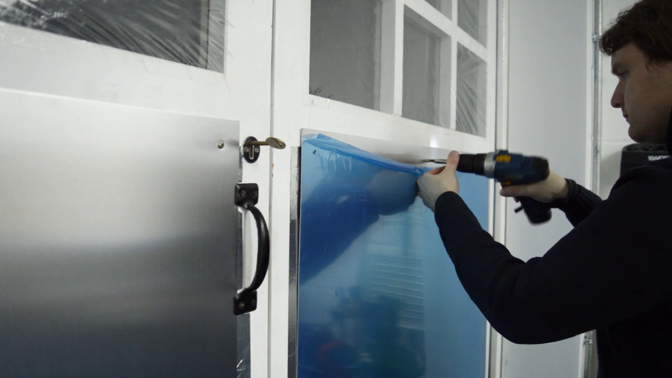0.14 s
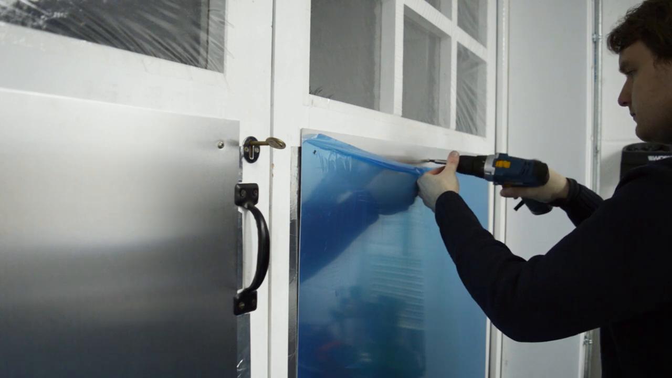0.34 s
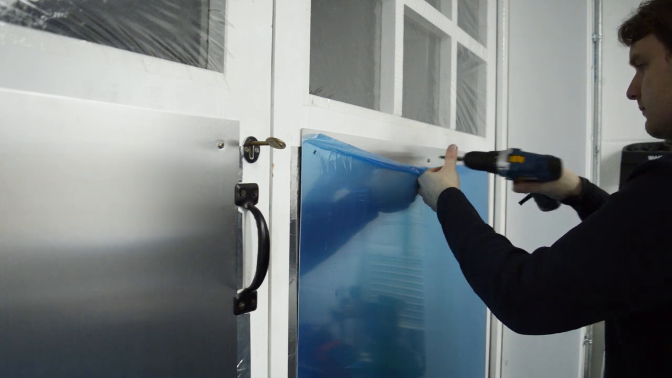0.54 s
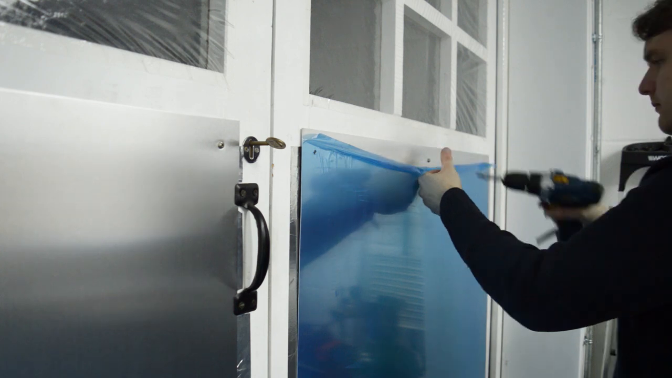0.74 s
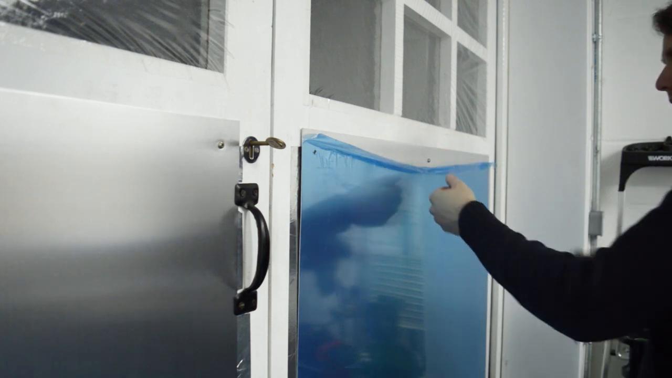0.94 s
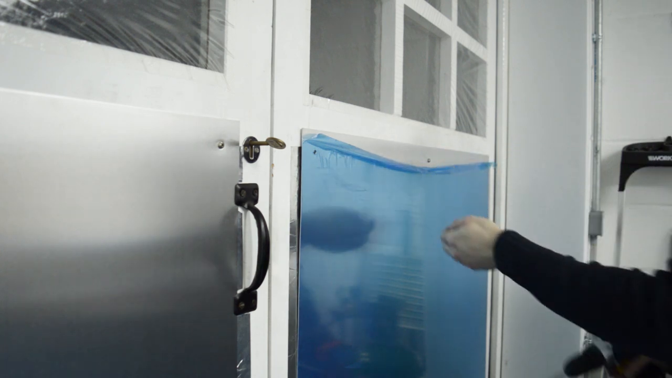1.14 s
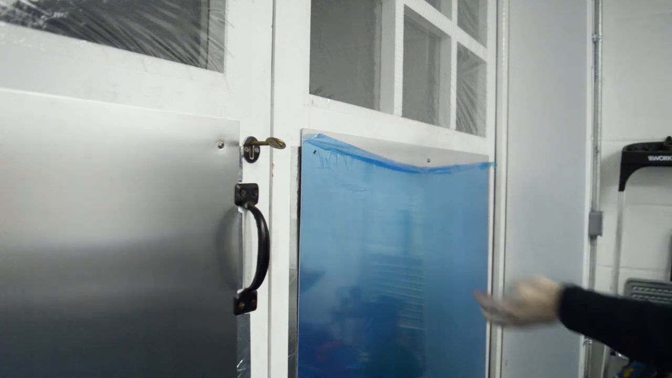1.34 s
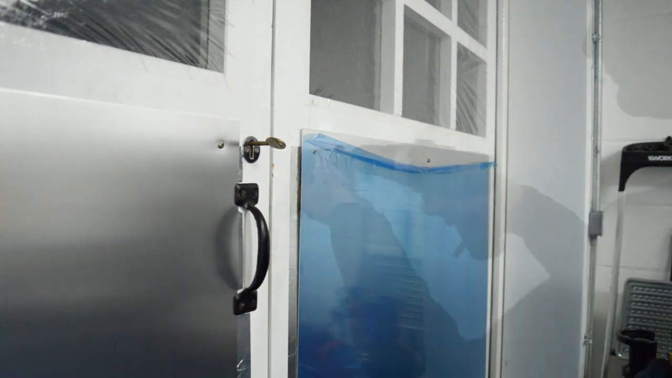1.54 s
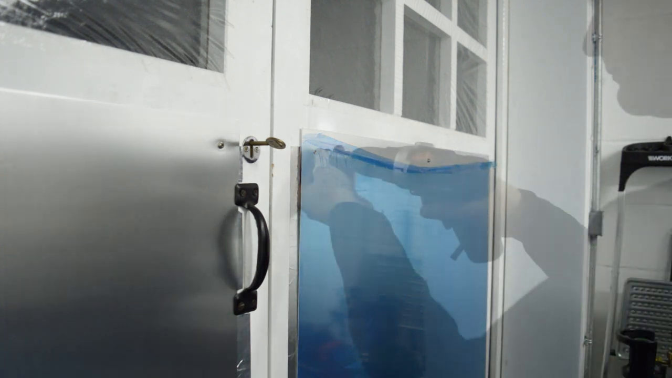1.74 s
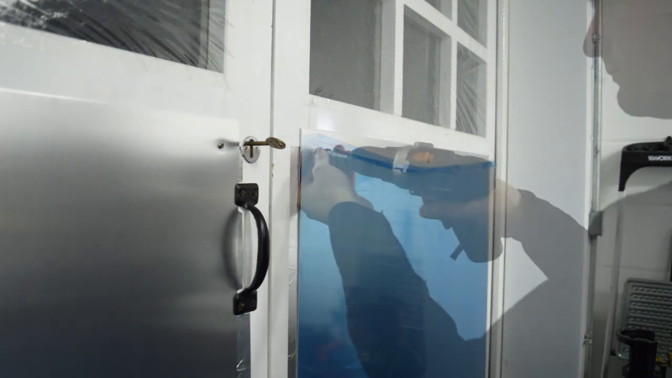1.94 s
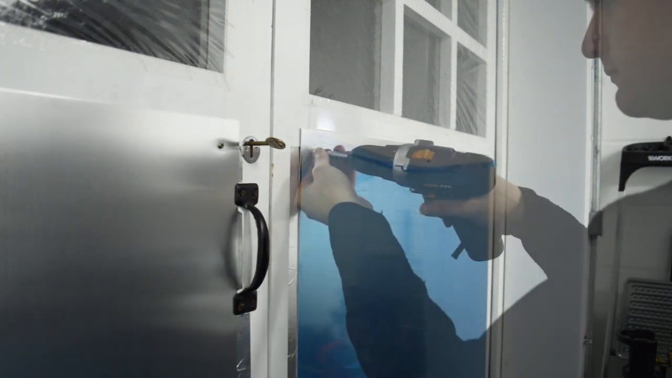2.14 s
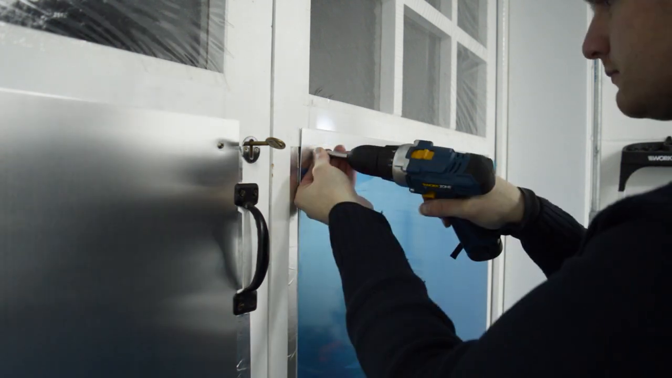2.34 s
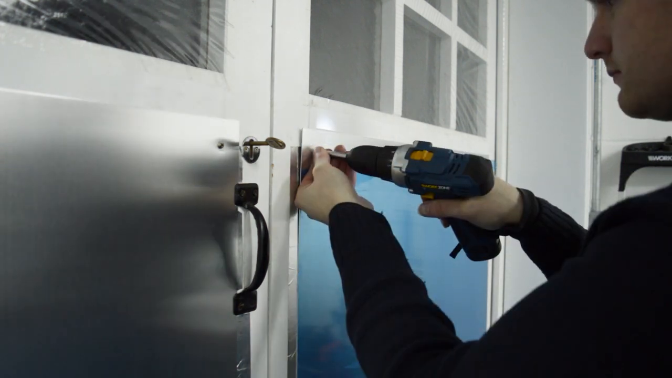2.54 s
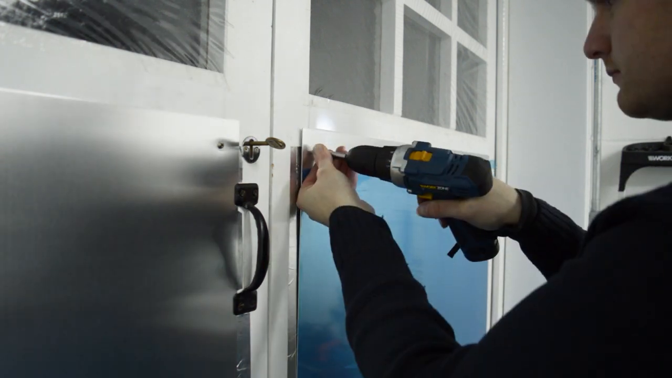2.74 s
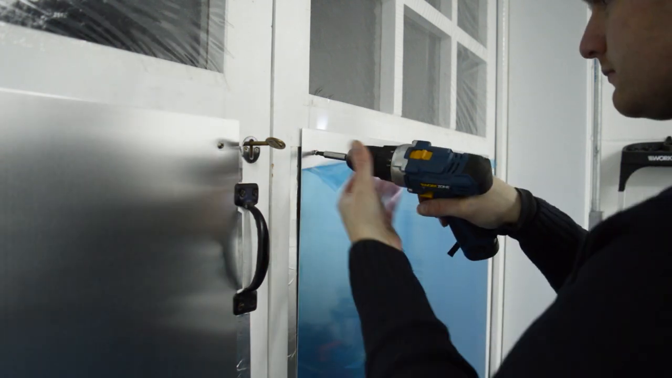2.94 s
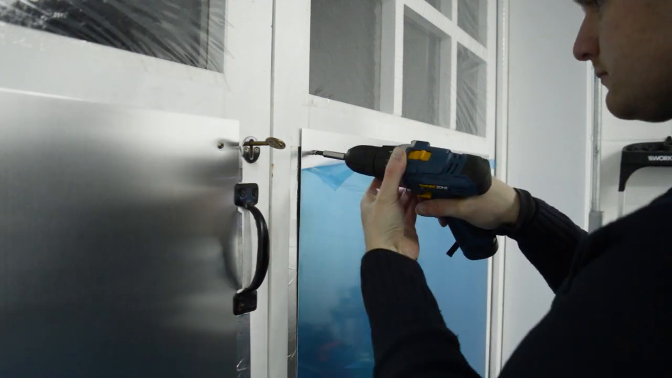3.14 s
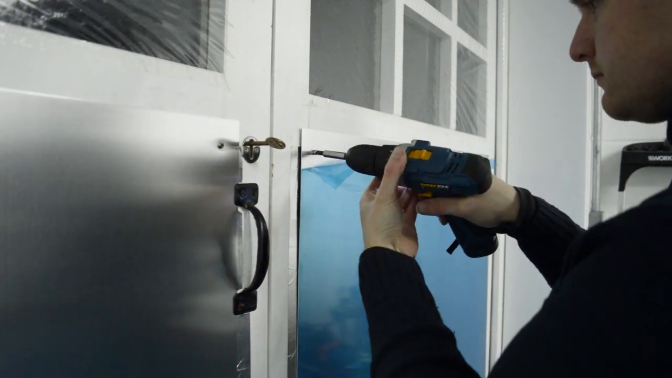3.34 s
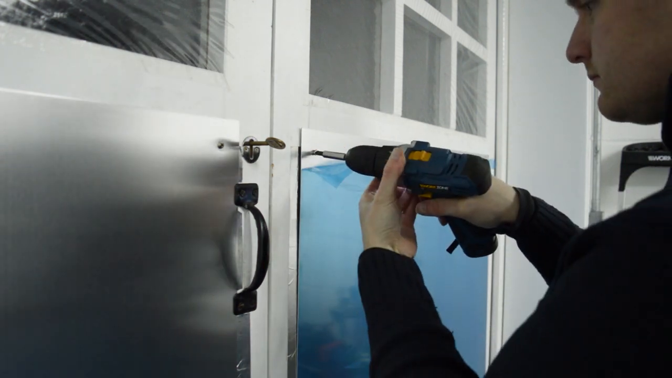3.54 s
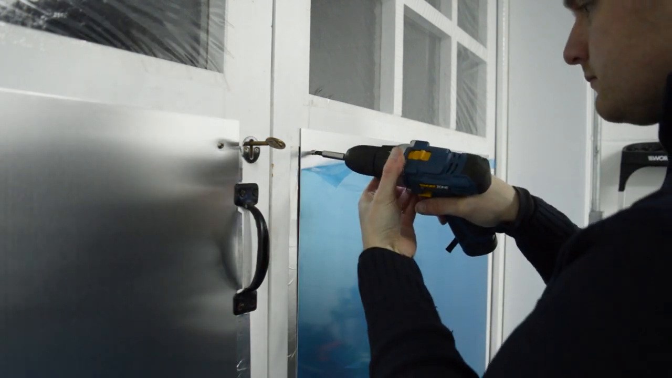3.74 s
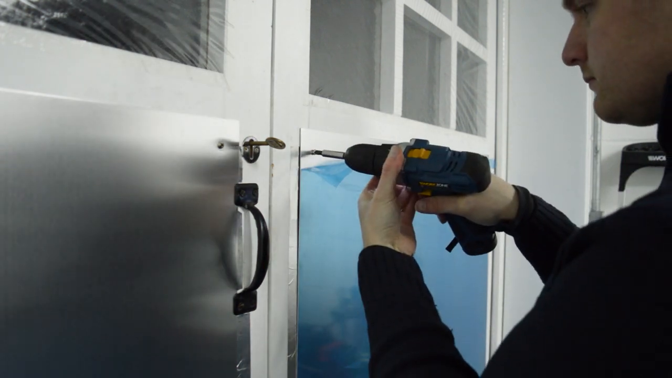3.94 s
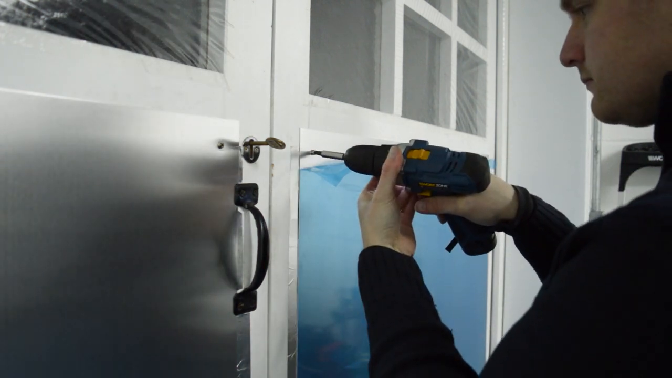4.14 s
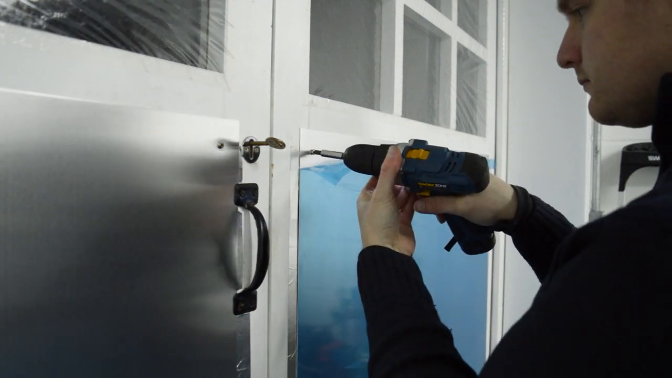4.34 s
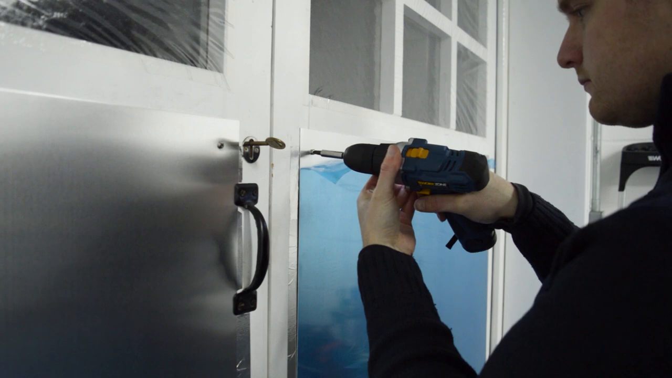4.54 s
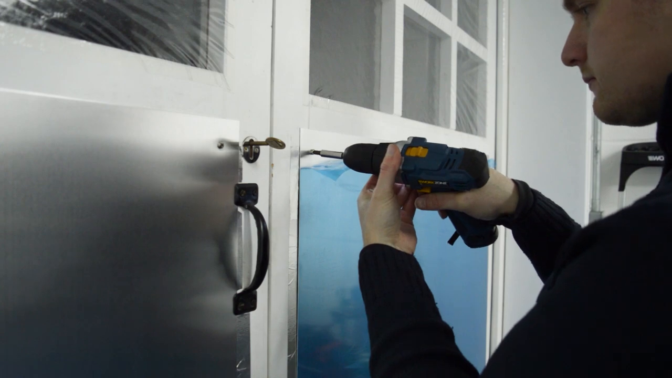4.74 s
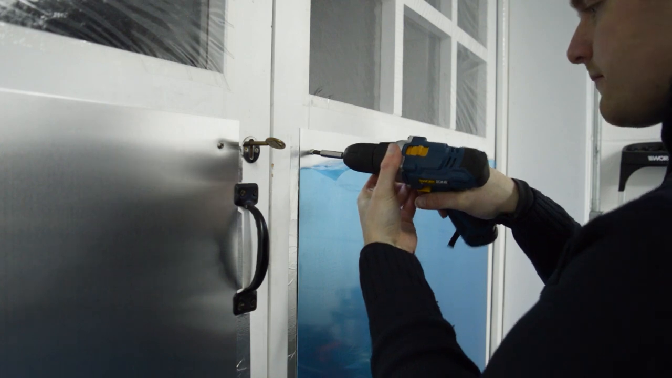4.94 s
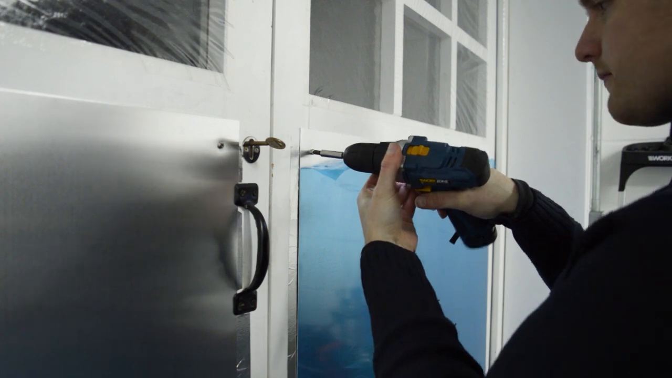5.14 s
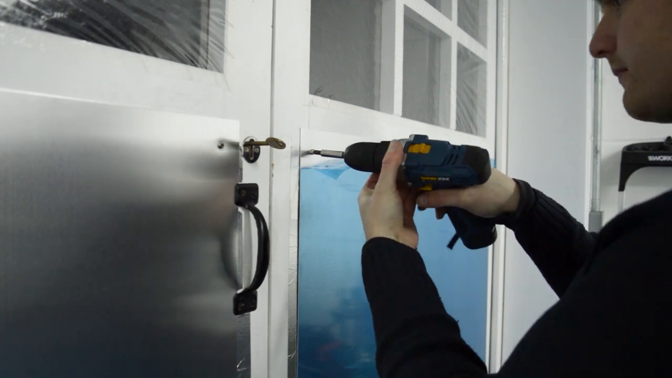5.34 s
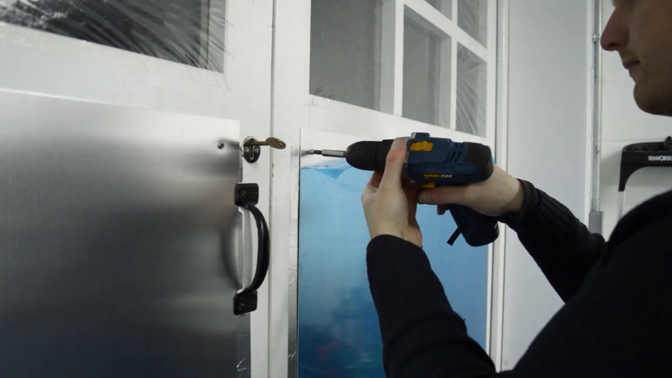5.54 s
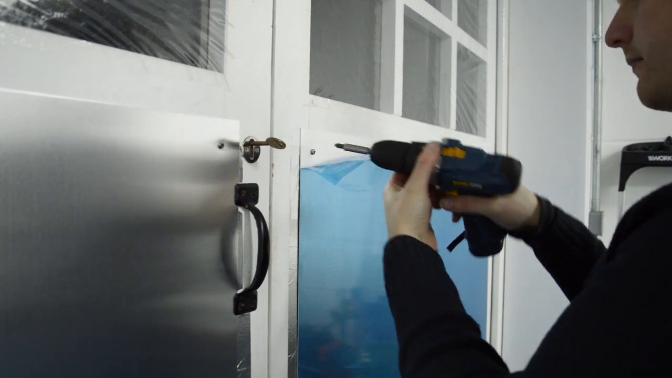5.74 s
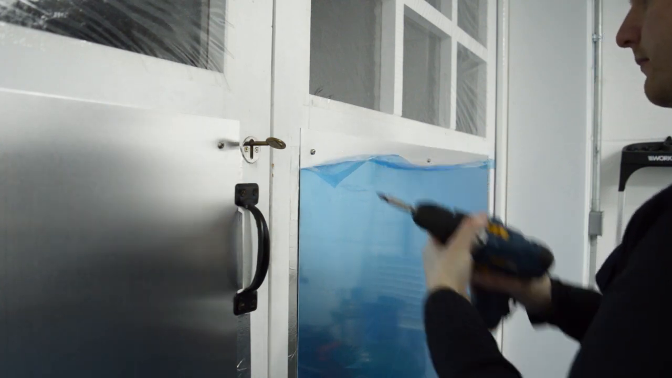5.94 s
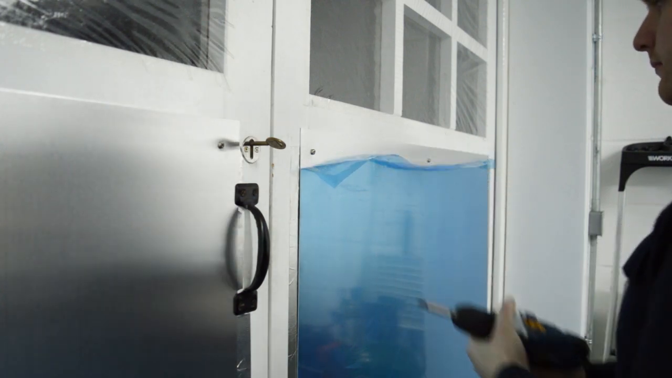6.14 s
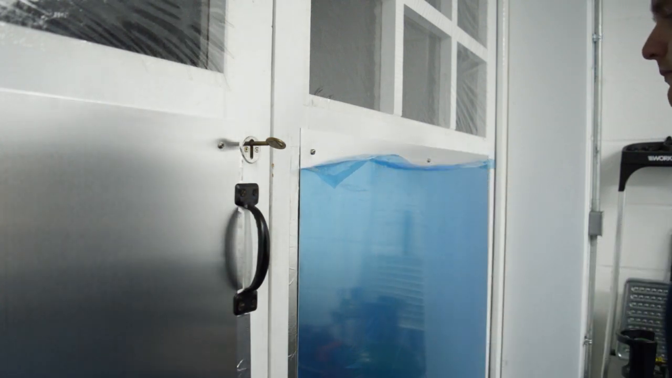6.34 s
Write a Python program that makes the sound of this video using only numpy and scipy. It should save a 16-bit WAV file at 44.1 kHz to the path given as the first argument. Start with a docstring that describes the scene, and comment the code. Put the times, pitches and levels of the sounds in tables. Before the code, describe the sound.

A cordless drill bangs off a screw, then creeps, races, slows and labours until its bit slips in seven rapid cracks and stops, in a hard-walled workshop.

```python
"""In a hard-walled workshop, a cordless drill drives screws through a metal sheet into a wooden door.
The bit slips off one screw and bangs on the door. On the next the motor creeps, races, slows and labours,
until the bit jumps out of the screw head seven times and the trigger is let go.
The drill is gear and shaft harmonics plus coloured noise, all following one motor speed;
blows are noise bursts and ringing door modes; decaying noise makes the reverberation."""
import sys
import numpy as np
from scipy import signal
from scipy.fft import rfft, irfft
from scipy.io import wavfile

SR = 44100
rng = np.random.default_rng(int(sys.argv[2]) if len(sys.argv) > 2 else 0)


def store_wav(level_fs):
    """Save 16-bit WAV to argv[1]."""
    pcm = np.round(np.clip(np.atleast_2d(level_fs), -1, 1) * 32767)
    wavfile.write(sys.argv[1], SR, pcm.T.astype(np.int16))


N = 282240
TIME = np.arange(N) / SR
CUTOFF_HZ = 16300


def from_db(db):
    """Decibels to gain."""
    return 10 ** (np.asarray(db) / 20)


def rms_one(x):
    """Scale to rms 1."""
    return x / np.sqrt(np.mean(x ** 2) + 1e-20)


def at_hz(points, hz):
    """Read a curve on a log-frequency axis."""
    point_hz, value = np.transpose(points)
    return np.interp(np.log(np.maximum(hz, 1)), np.log(point_hz), value)


def peak(hz, centre_hz, width_hz):
    """Gain of one resonance, 1 on top."""
    return 1 / np.sqrt(1 + (2 * (hz - centre_hz) / width_hz) ** 2)


def lift_db(resonances, hz):
    """Decibels that narrow resonances add at a frequency."""
    return sum(lift * peak(hz, centre, width) ** 2 for centre, width, lift in resonances)


def noise(spectrum, size=N, resonances=()):
    """Noise of a given colour, falling faster beyond its ends; rms 1."""
    hz = np.maximum(np.fft.rfftfreq(size, 1 / SR), 1)
    low_end = np.minimum(1, hz / spectrum[0][0]) ** 2
    high_end = np.minimum(1, spectrum[-1][0] / hz) ** 2
    gain = from_db(at_hz(spectrum, hz) + lift_db(resonances, hz)) * low_end * high_end
    return rms_one(irfft(rfft(rng.standard_normal(size)) * gain, size))


def drift(rate_hz):
    """Random values at rate_hz joined by straight lines; rms 1."""
    steps = rng.standard_normal(4000)
    return rms_one(np.interp(TIME * rate_hz, np.arange(len(steps)), steps))


def gate(start_s, stop_s, fade_s):
    """1 between two moments, dying away exponentially on either side."""
    outside_s = np.maximum(0, np.maximum(start_s - TIME, TIME - stop_s))
    return np.exp(-np.minimum(outside_s / fade_s, 50))


def dying(t, t60_s):
    """Fall by 60 dB in t60_s."""
    return from_db(-60 * t / t60_s)


def onset(t, rise_s):
    """Exponential rise from 0 towards 1."""
    return 1 - np.exp(-t / rise_s)


def add(out, sound, s):
    """Mix a sound in from second s."""
    i = max(0, round(s * SR))
    out[i:i + len(sound)] += sound[:N - i]


# Trigger let go. Each entry: time in seconds.
RELEASES_S = [.19, 5.29]
# Brush hiss spectrum. Each row: frequency in Hz, density in dB per Hz.
HISS = [(710, -45), (1200, -12), (1400, -1), (1830, -4), (2040, -2), (2320, -7), (2790, 1), (3470, -1),
        (3740, -3.5), (4220, -3.5), (9820, -2), (12500, -11.5), (15200, -29), (16000, -50.5)]
# Gearbox rumble spectrum. Each row: frequency in Hz, density in dB per Hz.
RUMBLE = [(29, -45.5), (50, -11), (105, -12), (150, 0), (214, -4.5), (420, -7.5), (679, -0.5), (931, -9),
          (1020, 1.5), (1180, -12), (1390, -6), (1800, -8.5), (2340, -10), (3960, -120)]
# First run, dying away: levels at the start and their fall.
FIRST_HISS_DB, FIRST_RUMBLE_DB, FIRST_FALL_DB_PER_S = -39, -41.5, 79
FADE_IN_S, FADE_IN_LENGTH_S = 1.349, 0.9  # second run
# Second run: base level at the working speed, gain per doubling of speed, gain under full load.
WORK_TURNS_PER_S = 100
HISS_DB, HISS_DB_PER_OCTAVE, HISS_LOAD_DB = -43.5, 2.5, 2.5
WHINE_DB, WHINE_DB_PER_OCTAVE, WHINE_LOAD_DB = -42, -0.9, 1.5
RUMBLE_DB, RUMBLE_DB_PER_OCTAVE, RUMBLE_LOAD_DB = -54, 1.44, 3.5
# Above this speed brushes and fan hiss much more and the gear whine thins out.
RUSH_TURNS_PER_S, RUSH_DB_PER_OCTAVE, THINNING_DB_PER_OCTAVE = 133, 3, 4.5
# Until the screw bites the gears run slack, quieter; at the bite current surges and brushes spark.
BITE_S, SLACK_DB, SURGE_DB = 2.305, -4.5, 5


def drill(buzz_db=-13.5, sparking=0.18, backlash_turns=0.00073):
    """Gear whine, shaft buzz, brush hiss and gearbox rumble follow the motor's speed and load."""
    speed, load = motor_speed(), tightness()
    # play in the gears blurs the high harmonics
    turns = np.cumsum(speed) / SR + backlash_turns * drift(500)
    octaves = np.log2(speed / WORK_TURNS_PER_S)
    rush = np.maximum(0, np.log2(speed / RUSH_TURNS_PER_S))
    slack_db = SLACK_DB * gate(0, BITE_S, fade_s=0.012)
    surge_db = SURGE_DB * gate(BITE_S, BITE_S, fade_s=0.011)

    first = from_db(-FIRST_FALL_DB_PER_S * TIME) * gate(0, RELEASES_S[0], fade_s=0.013)
    fade_in = np.clip((TIME - FADE_IN_S) / FADE_IN_LENGTH_S, 0, 1)
    second = fade_in * gate(0, RELEASES_S[1], fade_s=0.012)

    hiss_db = HISS_DB + HISS_DB_PER_OCTAVE * octaves + HISS_LOAD_DB * load
    hiss_db = hiss_db + RUSH_DB_PER_OCTAVE * rush + surge_db
    rumble_db = RUMBLE_DB + RUMBLE_DB_PER_OCTAVE * octaves + RUMBLE_LOAD_DB * load + slack_db
    whine_db = WHINE_DB + WHINE_DB_PER_OCTAVE * octaves + WHINE_LOAD_DB * load
    whine_db = whine_db - THINNING_DB_PER_OCTAVE * rush + slack_db
    hiss = first * from_db(FIRST_HISS_DB) + second * from_db(hiss_db)
    rumble = first * from_db(FIRST_RUMBLE_DB) + second * from_db(rumble_db)
    whine = second * from_db(whine_db)

    # the brushes scrape harder at one point of each turn
    scrape = 1 + sparking * np.cos(2 * np.pi * turns)
    brushes = rms_one(noise(HISS, resonances=CAN) * scrape * from_db(drift(300)))
    out = hiss * (brushes + from_db(buzz_db) * shaft(speed, turns))
    out = out + whine * gears(speed, turns) + second * bearing(speed, turns)
    return out + strained_bit(speed, turns) + rumble * noise(RUMBLE)


# Finger moves on the trigger. Each row: start in seconds, settling time in seconds,
# new motor speed in turns per second before load.
TRIGGER = [(1.83, .6, 92), (1.95, .7, 136), (2.275, .24, 291), (2.45, .25, 295), (2.66, .55, 77.4),
           (3.28, .36, 75.5), (3.605, .55, 117.3)]
CREEP_TURNS_PER_S = 54.6
# Bend of a speed change, 1 = straight: a squeeze acts at once and levels off, easing is nearly even.
SQUEEZE_BEND, EASE_BEND = 4, 1.31
LOAD_SAG = .425  # share of speed lost at full tightness


def motor_speed(wobble=.004):
    """Turns per s: follows trigger, sags under load; freed by a slip it races, then is dragged down."""
    speed = np.full(N, CREEP_TURNS_PER_S)
    for s, settle_s, goal in TRIGGER:
        before = speed[int(s * SR)]
        bend = SQUEEZE_BEND if goal > before else EASE_BEND
        left = np.clip(1 - (TIME - s) / settle_s, 0, 1) ** bend
        speed = np.where(TIME < s, speed, goal + (before - goal) * left)
    run_down = gate(0, RELEASES_S[-1], fade_s=.1).clip(.3)
    speed = speed * (1 - LOAD_SAG * tightness() ** 2) * run_down
    to_next_s, jumping = seating()
    racing = np.minimum(62 + 720 * to_next_s, 84)
    return np.where(jumping, racing, speed) * (1 + wobble * drift(110))


TIGHTEN_S = 4.18


def tightness():
    """0 while the screw turns freely, rising evenly to 1 at the first slip."""
    return np.clip((TIME - TIGHTEN_S) / (SLIPS[0][0] - TIGHTEN_S), 0, 1)


def seating():
    """Time left until the next slip (s), and whether the bit is jumping."""
    slips_s = np.array(SLIPS)[:, 0]
    upcoming = np.minimum(np.searchsorted(slips_s, TIME), len(slips_s) - 1)
    return slips_s[upcoming] - TIME, (TIME > slips_s[0]) & (TIME < slips_s[-1])


# Housing radiation of gear tones. Each row: frequency in Hz, gain in dB.
HOUSING = [(480.0, -19.5), (700.0, -17.5), (1050.0, -11.5), (1350.0, -17), (1470.0, -7.5), (1650.0, -18),
           (1950.0, -11), (2090.0, -3.5), (2450.0, -7.5), (2850.0, 0.5), (3300.0, -4), (4100.0, -15),
           (5000.0, -8.5), (6200.0, -6.5), (7500.0, -16), (9700.0, -2.5), (13000.0, -21)]
# Narrow resonances of motor can, chuck and bit. Each row: centre in Hz, width in Hz, lift in dB.
CAN = [(1344, 48, -1), (2900, 450, 1), (3387, 110, 4.5), (6000, 150, 3.5), (9640, 450, 3.5)]
# Tooth-mesh harmonics. Each row: multiple of the mesh rate, level in dB.
MESH = [(1.0, 0), (2.0, -4), (3.0, -3), (4.0, -3), (5.0, -4), (6.0, -2.5), (7.0, -3), (8.0, -6),
        (12.0, -6.5), (20.0, -23.5)]
TEETH = 9


def gears(speed, turns, runout=0.0036):
    """Harmonics of the pinion's tooth mesh, swelling as they pass the housing's resonances; rms 1."""
    out, power = 0, 0
    # the pinion runs slightly off centre: sidebands round the high harmonics
    off_centre = runout * np.sin(2 * np.pi * turns) * speed / speed.max()
    teeth = TEETH * turns + TEETH * off_centre
    for k in range(1, 21):
        hz = k * TEETH * speed
        gain_db = at_hz(HOUSING, hz) + lift_db(CAN, hz) + at_hz(MESH, k)
        gain = from_db(gain_db) * (hz < CUTOFF_HZ)
        flutter = from_db(1.5 * drift(70))
        out = out + gain * flutter * np.sin(2 * np.pi * (k * teeth + rng.random()))
        power = power + gain ** 2
    return rms_one(out / np.sqrt(power))


# Tones of the shaft's own turning. Each row: frequency in Hz, level in dB.
BUZZ = [(120, -13.5), (200, 5), (295, -3), (400, -4.5), (470, -1), (590, -7.5), (670, 0.5), (880, -7),
        (1300, -12), (2700, -9), (4300, -13.5), (5300, -3), (7000, -5), (8700, 1), (9600, 4), (10500, 4),
        (12000, -10), (15500, -17)]


def shaft(speed, turns, slots_db=5.5, count=54):
    """A comb of unequal lines, louder with speed; the three-slot armature favours every third."""
    out = 0
    turns = turns + .005 * drift(350)  # rattle blurs the high lines
    levels, phases = rng.standard_normal(count), rng.random(count)
    for k, (level, phase) in enumerate(zip(levels, phases), 1):
        hz = k * speed
        line_db = 3 * np.clip(level, -1, 1) * (k > 3) + slots_db * (k % 3 == 0)
        gain = from_db(at_hz(BUZZ, hz[::50]) + line_db).repeat(50)[:N]
        out = out + gain * (hz < CUTOFF_HZ) * np.sin(2 * np.pi * (k * turns + phase))
    return out * speed / speed.max()


def strained_bit(speed, turns, ring_hz=3930, width_hz=620, early_db=-13.5, growth=4.1, sideband_db=-13.0):
    """Gear tones crossing the loaded bit's resonance swell up to the first slip, then only while it grips."""
    to_next_s, jumping = seating()
    slips_s, _, _, squeal_db = np.transpose(SLIPS)
    tight = tightness()
    grip = np.interp(to_next_s, [.002, .009, .018, .022], [0, 1, 1, 0])
    swell = np.minimum(1, 3 * tight) ** 2 * from_db(early_db * (1 - tight ** growth))
    swell = swell * (TIME <= slips_s[0])
    tones = 0
    for k in range(36, 66, 3):
        # under load the three armature slots put weaker lines between the mesh harmonics
        share = 1 if k % TEETH == 0 else from_db(sideband_db) * tight
        ring = peak(k * speed, ring_hz, width_hz) ** 2 * from_db(4.4 * drift(80))
        tones = tones + share * ring * np.sin(2 * np.pi * k * turns)
    level = from_db(np.interp(TIME + to_next_s, slips_s, squeal_db))
    return level * np.where(jumping, grip, swell) * np.sqrt(2) * tones


BEARING_ORDER = 9.28  # cycles per shaft turn


def bearing(speed, turns, level_db=-46.5, flutter_db=0.5):
    """A bearing sings between the shaft's harmonics, growing with the square of speed."""
    level = from_db(level_db + flutter_db * drift(50)) * (speed / speed.max()) ** 2
    return level * np.sin(2 * np.pi * BEARING_ORDER * turns)


# Speed control singing, trigger part way in. Each row: start in seconds, stop in seconds,
# first pitch in Hz, last pitch in Hz, level in dB.
CHOPPER = [(1.864, 1.905, 3636, 3690, -46), (2.01, 2.24, 3652, 3610, -42), (3.243, 3.592, 3680, 3663, -44),
           (3.73, 4.659, 3690, 3627, -43.5)]


def chopper(octave_db=-17, waver_db=0.3):
    """The switched motor current makes the windings sing near one pitch, whatever the speed."""
    out = 0
    for start_s, stop_s, first_hz, last_hz, db in CHOPPER:
        hz = np.interp(TIME, [start_s, stop_s], [first_hz, last_hz])
        phase = 2 * np.pi * np.cumsum(hz) / SR
        tone = np.sin(phase) + from_db(octave_db) * np.sin(2 * phase)
        out = out + from_db(db) * gate(start_s, stop_s, fade_s=0.025) * tone
    return out * from_db(waver_db * drift(14))


# Bit jumps out of the screw head. Each row: time in seconds, steel crack in dB, door thump in dB,
# squeal of the bit just before in dB.
SLIPS = [(4.875, -12, -29.5, -34), (4.9477, -11, -30, -42.5), (5.02, -11.5, -30.5, -32.5),
         (5.0847, -12, -31, -34.5), (5.1472, -13.5, -35, -32), (5.2086, -13.5, -31.5, -33),
         (5.288, -12, -31, -41)]
# Bit lands on the sheet. Each row: time in seconds, steel crack in dB, door thump in dB.
BANGS = [(0.0, -35, -29), (0.1896, -22, -20.5), (.196, -45, -30.5)]
# Light touches of bit and screw. Each row: time in seconds, level in dB.
TICKS = [(.685, -56.5), (0.831, -64), (4.991, -30), (5.059, -27), (5.123, -22), (5.364, -39), (5.615, -58),
         (5.9, -72), (6.2, -66)]
# Steel spectrum of slips and touches. Each row: frequency in Hz, density in dB per Hz.
CRACK = [(880, -33), (1500, -12), (2060, -5.5), (2460, -23.5), (3000, 3), (3960, -8.5), (4500, -3.5),
         (6760, 1), (7840, -4), (9850, -1.5), (16000, -28.5)]
# Steel spectrum of landings on the sheet. Each row: frequency in Hz, density in dB per Hz.
SHEET_CRACK = [(880, -29.5), (1500, -7), (2270, -31.5), (3000, -11), (3480, -14), (3730, -14.5),
               (5830, -15), (6690, -14), (9190, -13.5), (16000, -39.5)]
# Door spectrum under slips. Each row: frequency in Hz, density in dB per Hz.
DOOR_SHAKE = [(29, -45), (50, -19.5), (71, -6), (112, -38), (136, -6.5), (211, -13), (245, -6.5),
              (356, -3.5), (387, -11.5), (479, -3), (808, -18.5), (1020, -5.5), (1120, -10.5),
              (2050, -14.5), (2500, -26), (3250, -49), (5500, -120)]
# Door spectrum under bangs. Each row: frequency in Hz, density in dB per Hz.
DOOR_BANG = [(29, -25.5), (50, -16), (119, -15.5), (168, -9.5), (204, -2.5), (283, -8.5), (334, -6),
             (410, -13), (486, -6.5), (555, -11.5), (760, -23.5), (920, -13.5), (1120, -9), (1410, -12.5),
             (2120, -31), (2500, -24), (3250, -53), (5500, -120)]


def blows(scrape_db=-7.0):
    """Slips, bangs and light touches: steel bursts, with the door's answer to slips and bangs."""
    out = np.zeros(N)
    for s, steel_db, wood_db, _ in SLIPS:
        # the bit scrapes up the slot, then snaps into the next one
        scrape = crack(CRACK, t60_s=0.054, grain_db=-1.5, rise_s=0.00078)
        snap = crack(CRACK, t60_s=.008, grain_db=1.0, rise_s=.0001)
        add(out, from_db(steel_db + scrape_db) * scrape, s - .001)
        add(out, from_db(steel_db) * snap, s + .0005)
        add(out, from_db(wood_db) * door(DOOR_SHAKE, t60_s=0.28, modes_db=-14.5), s)
    for s, steel_db, wood_db in BANGS:
        clang = crack(SHEET_CRACK, t60_s=0.11, grain_db=6.5, rise_s=0.0009)
        add(out, from_db(steel_db) * clang, s)
        add(out, from_db(wood_db) * door(DOOR_BANG, t60_s=0.29, modes_db=-11), s)
    for s, db in TICKS:
        add(out, from_db(db) * crack(CRACK, t60_s=.016, grain_db=2.0, rise_s=.0002), s)
    return out


def crack(spectrum, t60_s, grain_db, rise_s):
    """Steel scrapes over steel: a brief, uneven burst."""
    t = TIME[:SR // 8]
    knots = t[::40]
    unevenness = np.interp(t, knots, rng.standard_normal(len(knots)).clip(-1.5, 1.5))
    grains = rms_one(from_db(grain_db * unevenness))
    return noise(spectrum, size=len(t)) * grains * dying(t, t60_s) * onset(t, rise_s)


# Ringing modes of door and sheet. Each row: frequency in Hz, level in dB, t60 in seconds.
DOOR_MODES = [(160, -14, .3), (212.23, 6, 0.54), (230.5, -3.5, 0.26), (301.4, -11, 0.95), (345, -7, 0.45),
              (492.8, -3.5, 0.36), (1074, -17, 0.4), (1250, -23, 0.45), (1390, -24, 0.87),
              (6920, -19.5, 0.56), (6900, -22, 0.5)]


def door(spectrum, t60_s, modes_db):
    """A blow sets off the door's dense, short resonances and a few that ring on."""
    t = TIME[:SR]
    rings = 0
    for hz, db, ring_s in DOOR_MODES:
        spread, side = rng.standard_normal(2)
        tone = np.sign(side) * np.sin(2 * np.pi * hz * t)
        rings = rings + from_db(db + 2 * spread) * tone * dying(t, ring_s)
    thump = noise(spectrum, size=len(t)) * dying(t, t60_s)
    return (thump + from_db(modes_db) * rings) * onset(t, rise_s=0.0026)


# Door settling as the push comes off. Each row: time in seconds, level in dB.
BUMPS = [(0.47, -51), (5.599, -49)]


def settling(bump_hz=72, t60_s=0.195):
    """The door swings back against its frame with a soft, low bump: a decaying sine."""
    out, t = np.zeros(N), TIME[:SR]
    bump = np.sin(2 * np.pi * bump_hz * t) * dying(t, t60_s) * onset(t, rise_s=0.0038)
    for s, db in BUMPS:
        add(out, from_db(db) * bump, s)
    return out


# Workshop decay. Each row: frequency in Hz, t60 in seconds.
ROOM = [(100, 0.29), (300, 0.66), (700, 0.67), (1300, 0.77), (3000, 0.8), (6000, 0.43), (10000, 0.49),
        (16000, 0.25)]


def workshop(x, wet_db, build_up_s=0.016):
    """Diffuse reflections as noise bands, each dying at its own rate."""
    t, tail = TIME[:SR], 0
    edges_hz = np.geomspace(60, 18000, 10)
    for low, high in zip(edges_hz, edges_hz[1:]):
        band_filter = signal.butter(2, [low, high], "band", fs=SR, output="sos")
        band = signal.sosfilt(band_filter, rng.standard_normal(len(t)))
        tail = tail + band * dying(t, at_hz(ROOM, np.sqrt(low * high)))
    tail = tail * onset(t, build_up_s)
    tail = tail / np.sqrt(np.sum(tail ** 2))
    return from_db(wet_db) * signal.fftconvolve(x, tail)[:N]


# Background air spectrum. Each row: frequency in Hz, density in dB per Hz.
AIR = [(15, -46.5), (25, -13.5), (45, -7.5), (62, 2), (80, -7), (123, -10), (217, -8.5), (503, -12),
       (818, -9.5), (1100, -10.5), (1520, -12.5), (3250, -17), (8590, -23.5), (10100, -22), (11900, -21),
       (16000, -31)]


def air(level_db=-70.5):
    """Steady coloured noise under everything."""
    return from_db(level_db) * noise(AIR)


def scene():
    """Drill and door in the room, the same in both channels."""
    work = drill() + blows() + settling()
    mono = work + workshop(work, wet_db=-10.0) + chopper() + air()
    return np.array([mono, mono])


def record(dry):
    """An elliptic low-pass cuts the top steeply."""
    return signal.sosfilt(signal.ellip(10, .1, 80, CUTOFF_HZ, fs=SR, output="sos"), dry)


dry = scene()
out = record(dry)
store_wav(out)
```